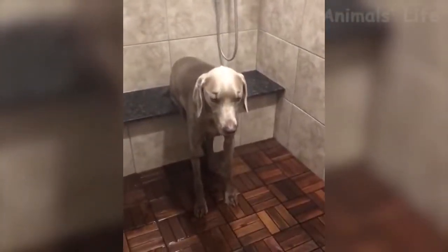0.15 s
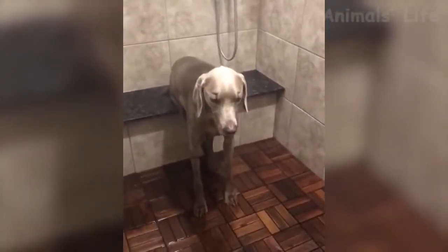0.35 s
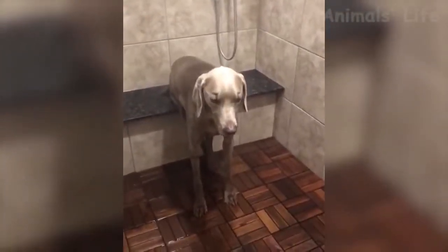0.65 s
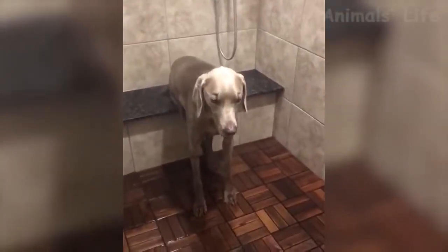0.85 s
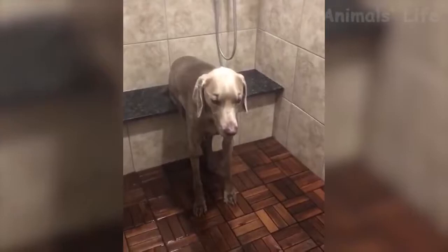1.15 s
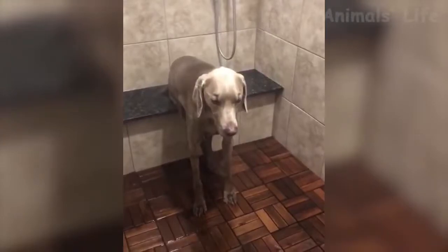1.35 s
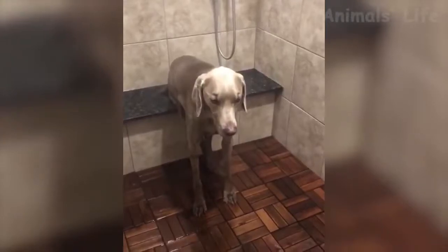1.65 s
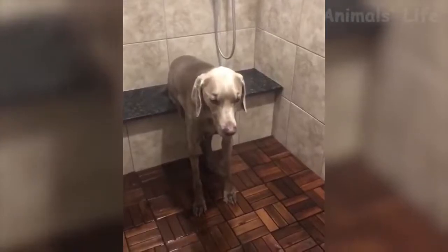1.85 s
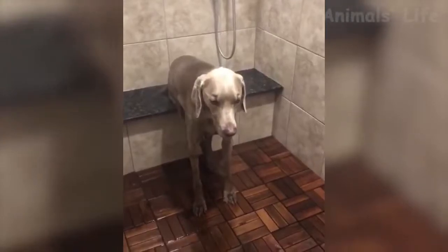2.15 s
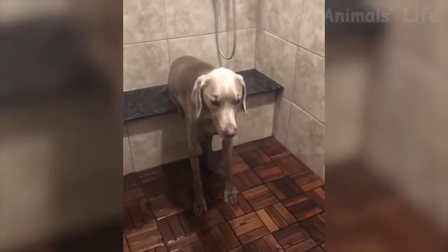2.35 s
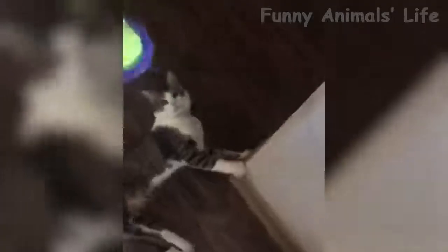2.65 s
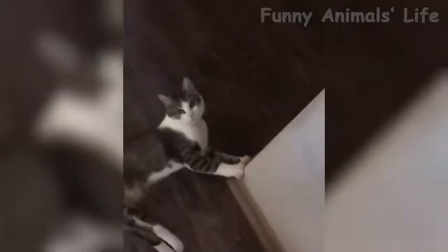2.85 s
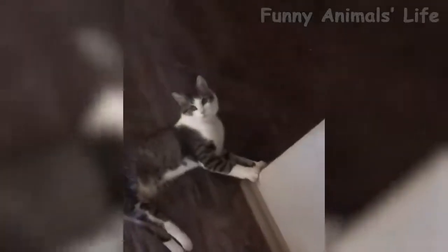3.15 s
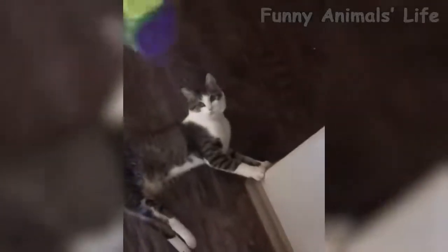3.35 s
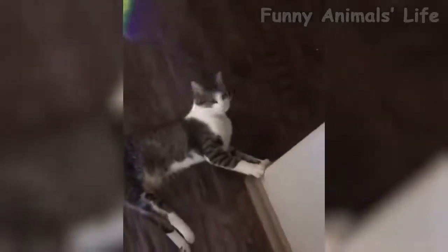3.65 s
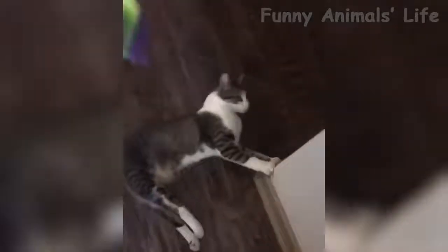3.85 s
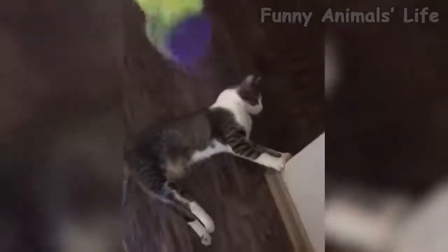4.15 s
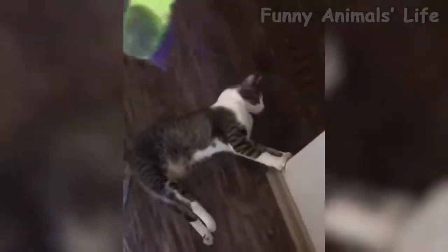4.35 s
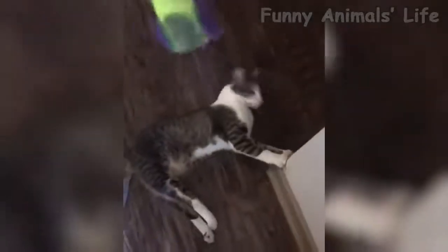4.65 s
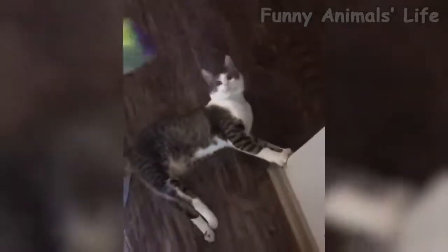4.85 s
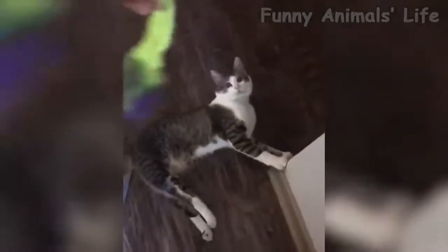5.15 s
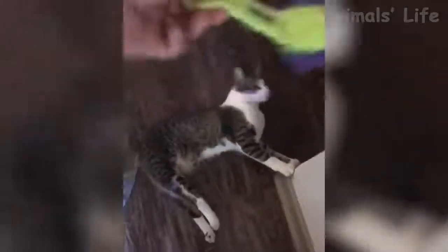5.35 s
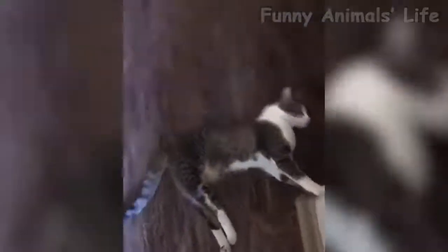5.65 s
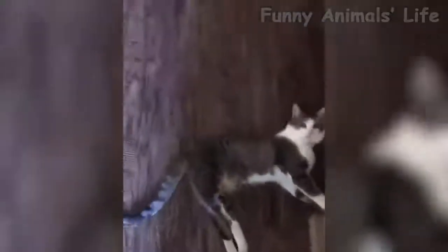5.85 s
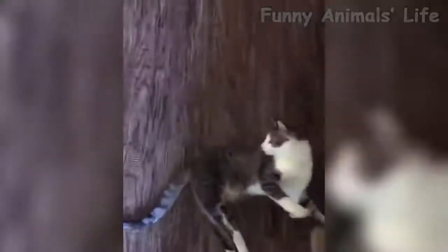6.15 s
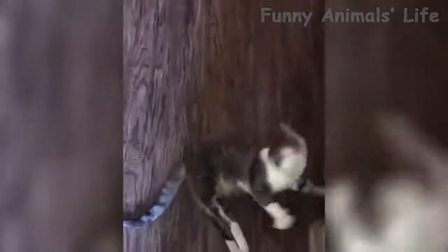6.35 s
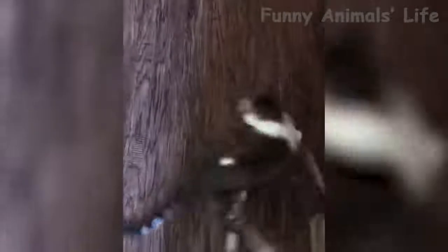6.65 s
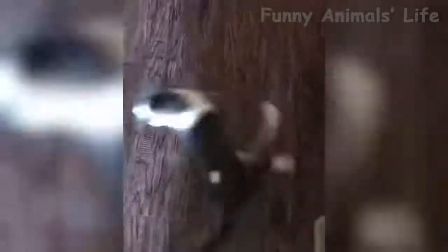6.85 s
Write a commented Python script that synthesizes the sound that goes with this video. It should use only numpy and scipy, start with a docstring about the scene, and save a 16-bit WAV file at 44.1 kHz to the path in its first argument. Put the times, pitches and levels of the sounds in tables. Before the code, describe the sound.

From the start a shower runs in a tiled stall: a loud, even hiss with small splashes flaring and heavy drops drumming the floor underneath. At about 2.6 seconds it cuts off abruptly, replaced by a quiet room where a low ventilation rumble and hum continue to the end. A cloth toy swishes softly between 3.1 and 3.5 seconds. Three quick, crisp tongue clicks call a cat at about 4.7, 4.8 and 5.0 seconds. At 6.2 seconds the toy lands on the wooden floor with a sharp double knock and a low thump. From 6.5 seconds the cat scrambles, its claws scuffing lightly on the boards, and pounces with a duller thud at about 6.7 seconds. One last faint scuff follows around 6.9 seconds.

```python
"""A shower runs in a tiled stall: countless small impacts merge into a hiss, heavy drops drum the floor,
jets flare as they catch a surface, and the stall resonates. The scene switches abruptly to a quiet room
where air rumbles in a ventilation duct. A cloth toy swishes by friction, and three tongue clicks, pops
filtered by the mouth, call a cat. The toy knocks on the wooden floor and the cat scrambles and pounces:
the blows excite the damped modes of the boards, and claws stick and slip on the grain."""
import sys
import numpy as np
from scipy import signal
from scipy.fft import rfft, irfft
from scipy.io import wavfile
from scipy.ndimage import uniform_filter1d

SR = 44100
rng = np.random.default_rng(int(sys.argv[2]) if len(sys.argv) > 2 else 0)


def master_out(mix):
    """Clip the mix to full scale and print it as 16-bit PCM to the path in sys.argv[1]."""
    frames = np.transpose(np.atleast_2d(mix))
    ceiling = np.clip(frames, -1, 1)
    pcm = np.round(ceiling * 32767).astype(np.int16)
    wavfile.write(sys.argv[1], SR, pcm)


N = 308700
T = np.arange(N) / SR
HZ = np.maximum(np.fft.rfftfreq(N, 1 / SR), 1)

# spectrum of the fine spray (frequency [Hz], relative level [dB])
SPRAY_SPECTRUM = [(350, -30.5), (600, -1.5), (719, -2.5), (787, 2.5), (1060, 1), (1430, 0.5), (1650, -5),
                  (2130, -5), (2720, -5.5), (5270, -2.5), (6650, -4.5), (11700, -2), (13200, -8)]
# slow swelling and easing of the water flow (time [s], relative level [dB])
WATER_FLOW = [(0.0, -24), (1.08, -24), (1.5, -23.5), (1.96, -23.5), (2.45, -26.5)]
# spectrum of heavy drops on the floor (frequency [Hz], relative level [dB])
DRUM_SPECTRUM = [(28, -23), (55, -8.5), (108, -10), (132, 2.5), (170, -1), (186, -8), (245, 0), (320, -7),
                 (420, -4), (520, -9.5), (700, -16)]
# jets catching a surface (time [s], length [s], centre [Hz], level [dB])
JET_SPLASHES = [(0.151, 0.006, 9000, -16.5), (0.153, 0.045, 9400, -22.5), (0.332, 0.009, 3880, -19.5),
                (0.338, 0.042, 3600, -26), (0.388, 0.029, 8200, -23), (0.541, 0.011, 10500, -22),
                (0.68, 0.064, 10400, -25.5), (0.826, 0.081, 5600, -22.5), (0.958, 0.085, 5430, -22.5),
                (1.052, 0.12, 5700, -30), (1.238, 0.062, 3500, -22.5), (1.296, 0.056, 3330, -35),
                (1.458, 0.044, 8050, -27.5), (1.58, 0.038, 3150, -27.5), (1.66, 0.058, 12400, -26.5),
                (1.741, 0.048, 3500, -26), (1.78, 0.043, 9900, -26.5), (1.888, 0.024, 3140, -25),
                (1.954, 0.052, 5570, -23.5), (2.042, 0.07, 4300, -28.5), (2.17, 0.06, 4700, -32),
                (2.338, 0.017, 8300, -22), (2.446, 0.077, 7600, -26.5), (2.483, 0.041, 4700, -23),
                (2.507, 0.0098, 8000, -22.5)]
# modes of the stall and its fittings (frequency [Hz], bandwidth [Hz], rms level [dB])
STALL_RESONANCES = [(203, 8, -47), (259, 6, -44), (361, 4, -49), (400, 5, -48), (830, 90, -47),
                    (990, 25, -50), (1346, 16, -48), (1384, 20, -47), (1458, 22, -48), (1739, 12, -52),
                    (2138, 9, -45.5), (2177, 14, -48.5), (3641, 18, -50)]
# blows on the floor (time [s], clatter level [dB], clatter cutoff [Hz], contact ring [Hz],
# ring level [dB], buzz decay [s], thump gain [dB], thump delay [s])
FLOOR_BLOWS = [(6.193, -19, 2940, 980, -30.5, 0.042, -30, 0.0027),
               (6.233, -35, 2600, 1030, -39, 0.059, -32.5, .011),
               (6.583, -36, 5000, 400, -44, 0.011, -54, 0.0033),
               (6.678, -29.5, 1190, 1140, -29, 0.068, -28, 0.0137)]
# modes of the floorboards (frequency [Hz], relative level [dB], time to fall 60 dB [s])
BOARD_MODES = [(49.4, 3, 0.48), (82.3, 8, 0.28), (118.8, 5, 0.43), (149, 5.5, 0.16), (232, -6, 0.2),
               (438, -24.5, 0.27)]
# spectrum of a blow's clatter (frequency [Hz], relative level [dB])
CLATTER_SPECTRUM = [(60, 1), (185, 10.5), (320, 1.5), (450, 1.5), (580, -1.5), (700, 0.5), (920, 2.5),
                    (1250, -4), (1480, -5), (1750, -9.5), (2100, -8.5), (2600, -8), (3400, -14),
                    (4300, -23), (6300, -15), (13000, -18)]
# tongue clicks (time [s], length [s], mouth resonance [Hz], mouth level [dB], teeth level [dB],
# snap level [dB], hollow behind the tongue [Hz], hollow level [dB], release delay [s])
TONGUE_CLICKS = [(4.675, 0.0078, 4520, -26.5, -31.5, -37, 3070, -31, .001),
                 (4.826, 0.02, 3120, -32, -43, -43.5, 1860, -38, 0.011),
                 (4.986, 0.0064, 2750, -31, -41, -38, 2070, -34.5, 0.0022)]
# resonances of the back of the mouth (frequency [Hz], resonator bandwidth [Hz], level [dB])
THROAT_RESONANCES = [(650, 370, -44), (1790, 430, -41.5)]
# claws and toy scuffing the floor (time [s], length [s], centre [Hz], bandwidth [Hz], level [dB])
FLOOR_SCUFFS = [(6.523, 0.007, 2730, 1050, -40.5), (6.582, 0.046, 3260, 2900, -44),
                (6.646, 0.021, 3180, 2200, -49), (6.657, 0.11, 3730, 2600, -49),
                (6.823, 0.1, 4400, 5000, -52.5)]
# swishes of the cloth toy (time [s], length [s], weave level [dB], folds level [dB])
TOY_SWISHES = [(3.082, 0.052, -44, -49), (3.13, 0.069, -53, -52), (3.277, 0.17, -59.5, -54)]
# spectra of the hissing weave and the rustling folds (frequency [Hz], relative level [dB])
WEAVE_SPECTRUM = [(500, -25), (1200, -10), (4500, -6), (6900, 1.5), (9700, -2), (13800, 0), (16000, -20)]
FOLDS_SPECTRUM = [(500, -22), (1000, -8), (1220, 1), (1550, -5), (1900, 2), (2200, -6), (2550, 0),
                  (2950, -5), (3450, 2), (4000, -8), (4800, -12), (6500, -5), (8500, -18), (14000, -22)]
# spectrum of moving air in the quiet room (frequency [Hz], relative level [dB])
AIR_SPECTRUM = [(20, -23), (42, -4.5), (80, -2), (120, 0), (170, -4.5), (250, -13.5), (350, -21),
                (500, -33.5), (900, -27.5), (1300, -34), (2000, -47.5), (3700, -43.5), (4900, -51),
                (6400, -45.5), (7700, -51), (14000, -50)]
# modes of the ventilation duct (frequency [Hz], bandwidth [Hz], rms level [dB])
DUCT_RESONANCES = [(46.4, 7.7, -43.5), (119.97, 2.1, -38.5), (258.4, 2.55, -48)]

SWITCH_S = 2.607
ROOM_T60_S, ROOM_TREBLE_T60_S = 0.65, 0.4
FLOW_DEPTH = 0.62  # share of the flow's swell that the fine spray follows
JET_WIDTH_HZ, JET_BROADENING = 1150, 1.16  # bandwidth at 4 kHz, and its exponent with frequency
MOUTH_SAG = 0.06  # share by which the mouth's pitch falls as the tongue drops


def undb(db):
    """Amplitude grows tenfold for every 20 dB."""
    return 10 ** (np.asarray(db) / 20)


def level(x, db):
    """Normalisation to a given rms level."""
    return x * undb(db) / np.sqrt(np.mean(x ** 2))


def colour(x, points):
    """Minimum-phase filtering: folding the cepstrum makes a spectrum's response causal."""
    hz, db = np.transpose(points)
    gain = undb(np.interp(np.log(HZ), np.log(hz), db))
    cepstrum = irfft(np.log(gain), N)
    cepstrum[1:N // 2] *= 2
    cepstrum[N // 2 + 1:] = 0
    return irfft(rfft(x) * np.exp(rfft(cepstrum)), N)


def ring(x, hz, width):
    """A damped resonator with unit gain at its centre."""
    hz = min(hz, SR / 2 - 2000)
    return signal.lfilter(*signal.iirpeak(hz, hz / width, fs=SR), x + 1e-18)


def band(x, hz, width, db):
    """Two equal resonators in cascade pass a narrower band than either alone."""
    return level(ring(ring(x, hz, width), hz, width), db)


def rolloff(x, hz, side, order=2):
    """A maximally flat filter falls 6 dB per octave for each order."""
    return signal.sosfilt(signal.butter(order, hz, side, fs=SR, output="sos"), x)


def steep_lowpass(x, hz):
    """An elliptic filter trades slight ripple for a steep cutoff."""
    return signal.sosfilt(signal.ellip(12, .1, 80, hz, fs=SR, output="sos"), x)


def wander(per_s):
    """Smoothing random steps gives a drift of spread near 1."""
    hold = int(SR / per_s)
    steps = np.repeat(rng.standard_normal(N // hold + 1), hold)
    return uniform_filter1d(steps, hold)[:N]


def impacts(per_s, spread_db):
    """Shot noise: independent impulses of uneven size."""
    hits = (rng.random(N) < per_s / SR) * rng.choice([-1, 1], N)
    return hits * undb(spread_db * np.minimum(rng.standard_normal(N), 2))


def reverb(x, wet_db, t60=ROOM_T60_S, treble_t60=ROOM_TREBLE_T60_S):
    """Diffuse reflections decay exponentially, at separate rates below and above 3 kHz."""
    t = T[:SR]
    low, high = (rolloff(rng.standard_normal(SR), 3000, side) for side in ("low", "high"))
    tail = (low * undb(-60 * t / t60) + high * undb(-60 * t / treble_t60)) * (t > .004)
    reflections = signal.fftconvolve(x, tail / np.linalg.norm(tail))[:N]
    wet = undb(wet_db)
    return (x + wet * reflections) / np.hypot(1, wet)


def swell(start, length):
    """A transient envelope: quadratic rise and exponential decay, peaking at half the length."""
    age = np.clip((T - start) / (length / 2), 0, 20)
    return age ** 2 * np.exp(2 * (1 - age))


def bursts(grains, table):
    """Amplitude modulation cuts band-limited flares from a stream of grains."""
    # the factor 1.63 offsets the narrowing of the cascade
    return sum(band(grains, hz, 1.63 * width, db) * swell(start, length)
               for start, length, hz, width, db in table)


def resonances(table, wander_db):
    """Forced vibration: random buffeting sustains narrow modes, each drifting in level."""
    force = rng.standard_normal(N)
    return sum(level(ring(force, hz, width) * undb(wander_db * wander(6)), db) for hz, width, db in table)


def shower():
    """Superposition: four sounds of water add to the resonances of the stall."""
    water = fine_spray() + spatter() + heavy_drops() + jets()
    return steep_lowpass(water + resonances(STALL_RESONANCES, wander_db=2.5), hz=13250)


def fine_spray():
    """Dense droplet impacts merge into shot noise, blended by reflections from the tiles."""
    times, flow_db = np.transpose(WATER_FLOW)
    swell_db = FLOW_DEPTH * np.interp(T, times, flow_db - flow_db.mean())
    droplets = impacts(per_s=7000, spread_db=3.5) * undb(swell_db + 1.96 * wander(21.4))
    hiss = reverb(droplets, wet_db=-5.5, t60=0.69, treble_t60=0.36)
    return level(colour(hiss, SPRAY_SPECTRUM), db=-27.5)


def spatter():
    """Streams wander over the floor, each a band of shot noise with its own fluctuating level."""
    streams = 0
    for hz in np.linspace(2400, 12400, 11):
        stream = ring(impacts(per_s=2500, spread_db=4), hz, width=.12 * hz)
        streams += level(stream, 0) * undb(4.3 * wander(22))
    return level(reverb(streams, wet_db=-5, t60=.45, treble_t60=.35), db=-31.5)


def heavy_drops():
    """Sparser, heavier impacts drive the low-frequency response of the floor."""
    drumming = reverb(impacts(per_s=900, spread_db=3.5), wet_db=-6, t60=0.92, treble_t60=0.16)
    return level(colour(drumming, DRUM_SPECTRUM), db=-27)


def jets():
    """A jet catching a surface gives a burst of impact noise, broader in band at higher pitch."""
    droplets = impacts(per_s=7000, spread_db=5) * undb(2 * wander(140))
    splashes = [(start, length, hz, JET_WIDTH_HZ * (hz / 4000) ** JET_BROADENING, db)
                for start, length, hz, db in JET_SPLASHES]
    return reverb(bursts(droplets, splashes), wet_db=-4.5, t60=0.41, treble_t60=0.5)


def floor_blows():
    """Impact excitation: the contact cracks and buzzes, then the weight rings the boards' damped modes."""
    cracks, thumps = 0, 0
    noise = rng.standard_normal(N)
    clatter = colour(noise, CLATTER_SPECTRUM)
    for start, db, cutoff_hz, ring_hz, ring_db, buzz_s, thump_db, delay in FLOOR_BLOWS:
        contact = level(rolloff(clatter, cutoff_hz, "low"), db)
        contact += band(noise, ring_hz, width=600, db=ring_db)
        buzz = undb(-5.5) * (T > start) * np.exp(-np.maximum(T - start, 0) / buzz_s)
        cracks += contact * (swell(start, 0.0024) + buzz)
        age = np.maximum(T[:SR] - delay, 0)
        boards = sum(undb(mode_db - 60 * age / t60) * np.sin(2 * np.pi * hz * age)
                     for hz, mode_db, t60 in BOARD_MODES)
        landing = 1 - np.exp(-age / 0.0061)
        thumps += undb(thump_db) * np.pad(boards * landing, (int(start * SR), N))[:N]
    return reverb(cracks, wet_db=-5.5) + thumps


def tongue_clicks():
    """Cavity resonance: a wet seal tears in tiny pops that ring the mouth, its gaps and its hollow."""
    tears, openings = 0, 0
    pops = impacts(per_s=19000, spread_db=-1.5)
    throat = sum(band(pops, *resonance) for resonance in THROAT_RESONANCES)
    for start, length, mouth_hz, mouth_db, teeth_db, snap_db, hollow_hz, hollow_db, delay in TONGUE_CLICKS:
        tight_mouth = band(pops, mouth_hz * (1 + MOUTH_SAG / 2), width=640, db=mouth_db)
        open_mouth = band(pops, mouth_hz * (1 - MOUTH_SAG / 2), width=640, db=mouth_db - 4.5)
        tears += tight_mouth * swell(start, 0.62 * length)
        tears += open_mouth * swell(start + 0.5 * length, 0.76 * length)
        # the narrow gaps at the teeth and lips ring highest
        gaps = band(pops, hz=5750, width=2200, db=teeth_db) + band(pops, hz=8700, width=1500, db=snap_db)
        openings += gaps * swell(start, 0.86 * length)
        # the hollow behind the tongue rings as it lets go
        hollow = throat + band(pops, hollow_hz, width=850, db=hollow_db)
        openings += hollow * swell(start + delay, 0.009)
    return reverb(tears, wet_db=-8) + reverb(openings, wet_db=-12.5)


def scuffs():
    """Stick-slip friction: claws and toy catch and release on the wood grain."""
    slips = impacts(per_s=2900, spread_db=4.5)
    return reverb(bursts(slips, FLOOR_SCUFFS), wet_db=-10)


def toy_swishes():
    """Friction makes the weave hiss and the folds rustle; a close reflection comb-filters the hiss."""
    echo_s, echo_db = 0.000594, -8
    weave = colour(impacts(per_s=13000, spread_db=3.5), WEAVE_SPECTRUM)
    weave += undb(echo_db) * np.interp(T - echo_s, T, weave)
    folds = colour(impacts(per_s=5000, spread_db=4.5), FOLDS_SPECTRUM)
    cloth = sum((level(weave, weave_db) + level(folds, folds_db)) * swell(start, length)
                for start, length, weave_db, folds_db in TOY_SWISHES)
    return reverb(cloth, wet_db=-3.5)


def ventilation():
    """Flow noise: air rumbles and faintly hisses while the duct resonates."""
    air = colour(rng.standard_normal(N), AIR_SPECTRUM) * undb(.5 * wander(5))
    return level(air, db=-38) + resonances(DUCT_RESONANCES, wander_db=-0.1)


def scene():
    """A 5 ms crossfade leads from the stall to the quiet room, the same in both ears."""
    in_stall = np.clip((SWITCH_S - T) / .005, 0, 1)
    stall = shower()
    room = ventilation() + toy_swishes() + tongue_clicks() + floor_blows() + scuffs()
    mono = in_stall * stall + (1 - in_stall) * room
    return np.array([mono, mono])


def record(dry):
    """Band limiting: the microphone drops the deepest bass and the highest treble."""
    return steep_lowpass(rolloff(dry, hz=33, side="high", order=4), hz=14100)


dry = scene()
out = record(dry)
master_out(out)
```